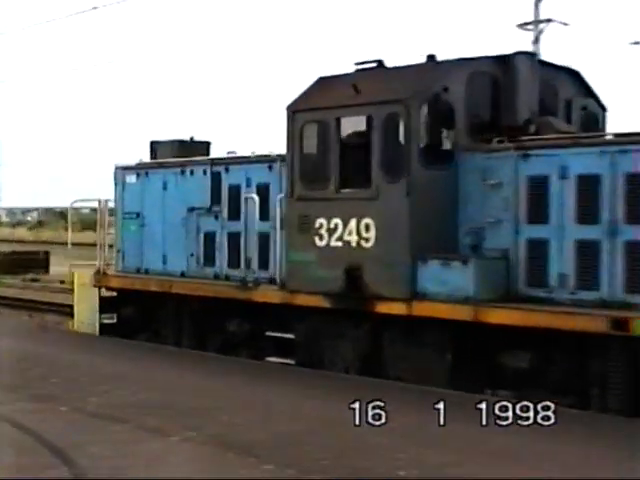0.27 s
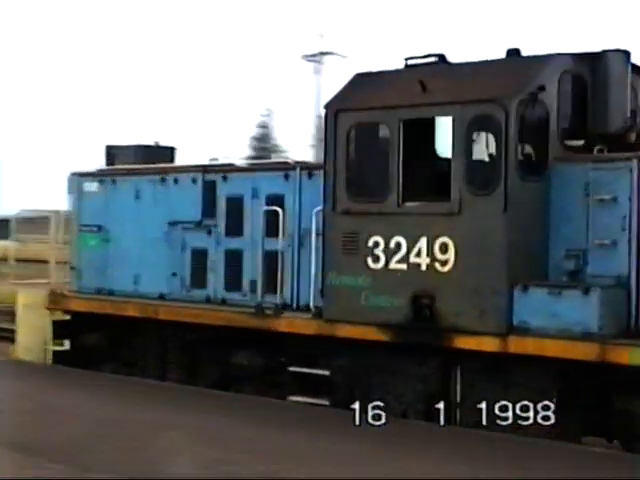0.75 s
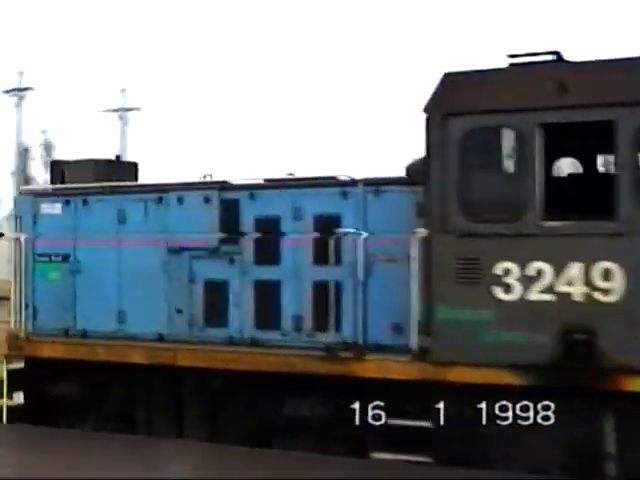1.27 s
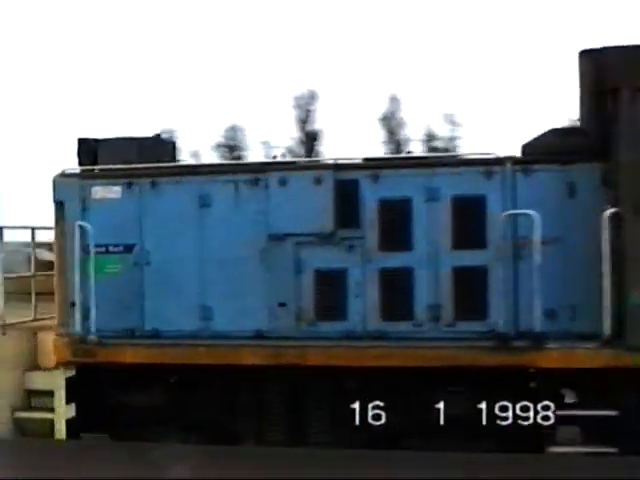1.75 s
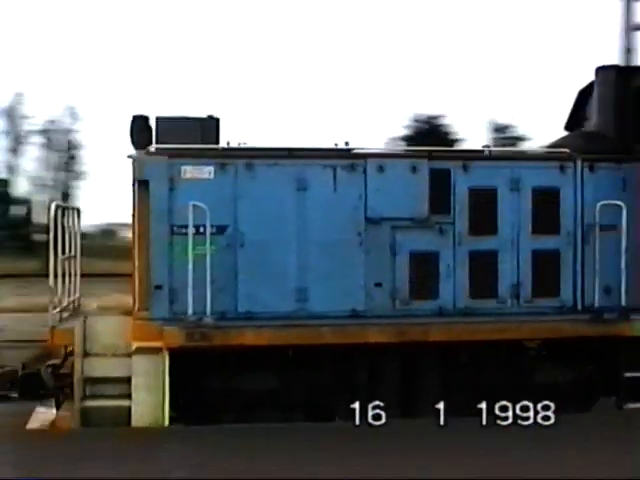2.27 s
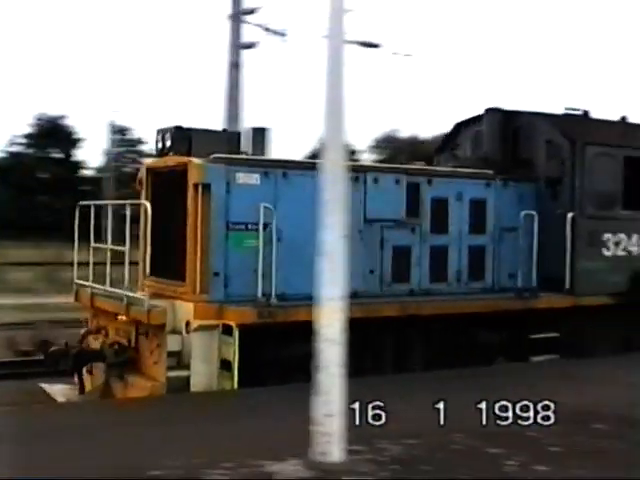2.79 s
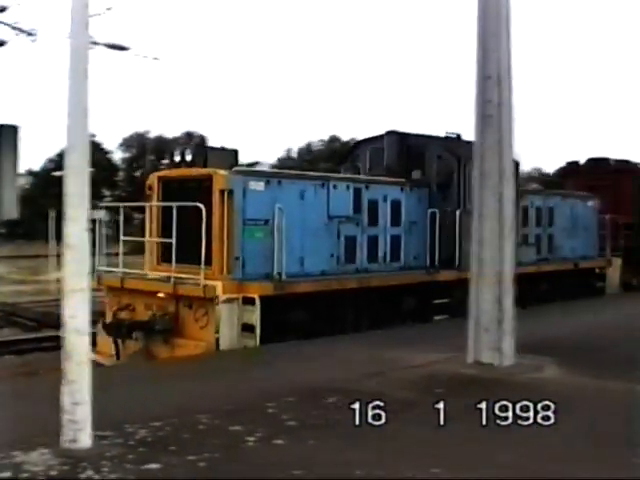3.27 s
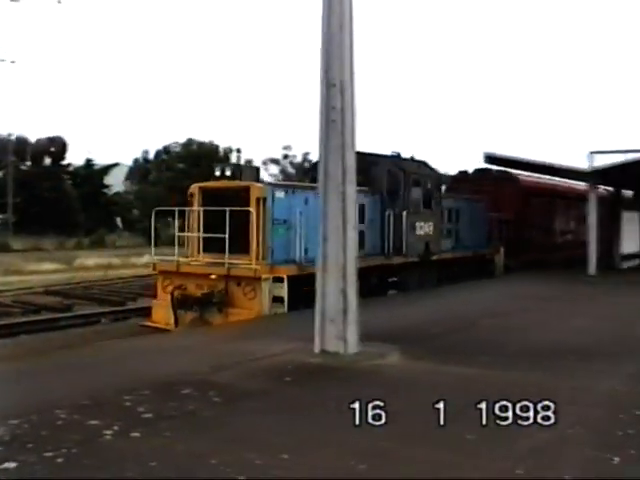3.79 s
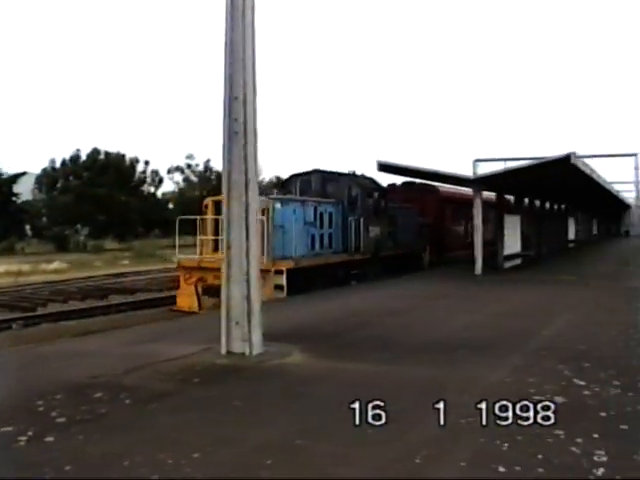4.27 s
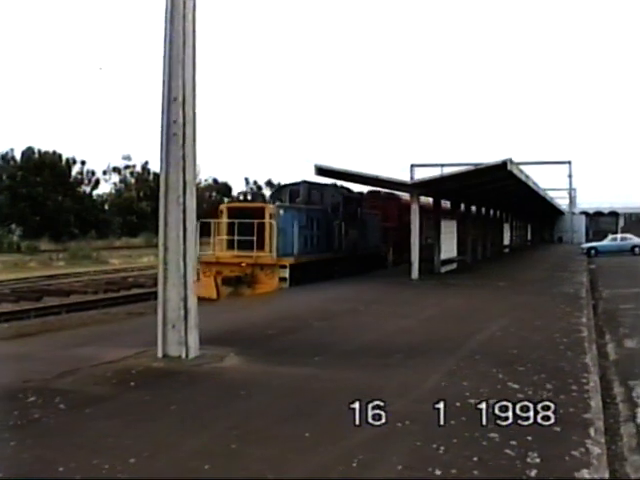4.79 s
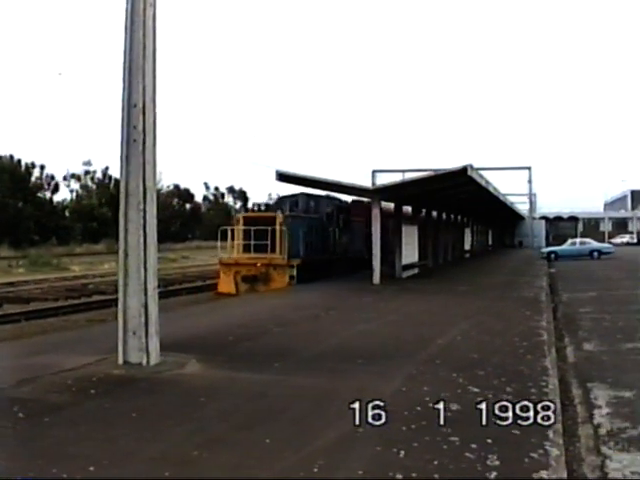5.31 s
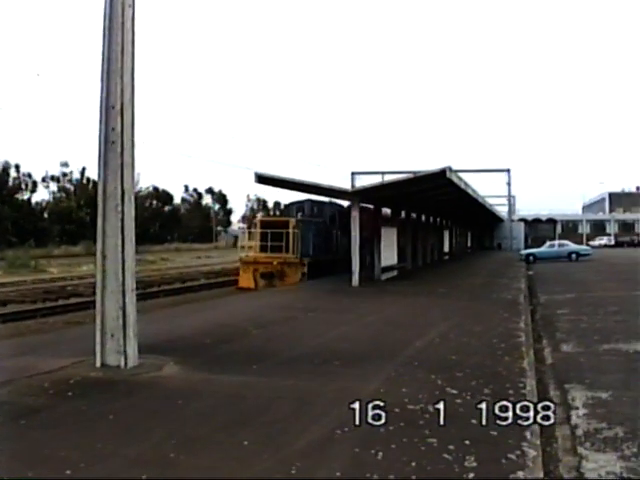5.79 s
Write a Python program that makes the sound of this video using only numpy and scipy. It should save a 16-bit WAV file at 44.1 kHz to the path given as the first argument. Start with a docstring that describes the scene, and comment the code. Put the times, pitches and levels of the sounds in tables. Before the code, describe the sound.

A diesel shunting locomotive rumbles past a platform with rough wheel rush, hollow body booms, knocks and thin squeaks, while wind buffets the microphone.

```python
"""A diesel shunting locomotive rolls past a station platform, with wind on the microphone.
From the start, engine puffs and rolling noise rumble, the steel body drones, and wheels rush, hiss and crackle.
Gusts buffet the microphone; thin squeaks, short one-note booms, dull knocks and sharp ticks join in turn.
A higher hum swells later as the wagons follow, while the rumble slowly fades as the locomotive leaves.
Most layers are shaped noise; the booms are wavering tones and the ticks mix tones with noise."""
import sys
import numpy as np
from scipy import signal
from scipy.fft import rfft, irfft
from scipy.io import wavfile
from scipy.ndimage import uniform_filter1d

SR = 44100
rng = np.random.default_rng(int(sys.argv[2]) if len(sys.argv) > 2 else 0)


def file_out(sig):
    """Save sig as 16-bit WAV at sys.argv[1]."""
    # one column per channel
    cols = np.atleast_2d(sig).T
    # limit, then scale
    lim = np.clip(cols, -1, 1)
    pcm = np.round(lim * 32767).astype(np.int16)
    wavfile.write(sys.argv[1], SR, pcm)


N = 266805
TIME = np.arange(N) / SR  # seconds

FIRING_HZ = 46  # average rate of the engine puffs
DIP_FALL_S = 0.0052
RING_WANDER = .012  # share by which the wheel resonances drift as the contact point moves
GRIT_DB = -7.5  # relative to the finest hiss
OFFSET = .4988  # constant offset, as a share of full scale
EDGE_HZ = 12300  # upper edge of the recorder's band

# rolling noise of the train, swelling as each bogie goes by: (time [s], level [dB])
ROLLING_LEVEL = [(0, -2), (.95, 1), (1.08, 0), (1.27, -5.5), (1.5, -2.5), (1.78, -5), (2.1, -9), (2.45, -7),
                 (3.5, -2.5), (3.72, 1), (3.9, -2.5), (4.05, -4), (4.3, -0.3), (4.62, 4), (4.78, -6.5),
                 (4.93, -3.5), (5.05, -8), (5.2, -3.5), (5.3, -5.5), (5.43, -2.5), (5.52, -7), (5.62, -8),
                 (5.85, -7), (5.97, -3), (6.04, -17)]
# abrupt drops that creep back: (time [s], depth before recovery [dB], recovery time [s])
LEVEL_DIPS = [(1.11, 3.5, 0.068), (1.255, 1.5, 0.045), (1.70, 0.5, 0.12), (1.935, 5.5, 0.042),
              (2.565, 3.5, 0.034), (3.917, 10.5, 0.035), (4.03, 1.5, 0.073), (4.68, 0, .06),
              (5.237, 5, 0.067), (5.712, 6.5, 0.043)]
# how the rumble follows the rolling:
# (level at 0 dB rolling [dB], change per rolling change [dB/dB], fade as the locomotive leaves [dB/s])
RUMBLE_FOLLOW = (-29.5, 0.44, 0.85)
# spectrum shape of the rumble: (frequency [Hz], level per Hz [dB])
RUMBLE_SPECTRUM = [(40, -19), (100, -17), (175, 0), (240, -3), (330, -0.5), (420, -2.5), (520, -4.5),
                   (640, -8), (760, -10.5), (900, -15.5), (1100, -16), (1450, -26.5), (2500, -35),
                   (6000, -87)]
# coarse roar of the wheels, before jolts and dips: (time [s], level [dB])
ROAR_LEVEL = [(0, -39.5), (.3, -40.5), (.7, -37.5), (1, -36.5), (1.28, -46), (1.55, -43.5), (2.1, -48),
              (2.6, -45), (3.4, -42.5), (3.8, -39.5), (4.05, -49), (4.3, -40), (4.6, -38.5), (4.8, -43),
              (5.25, -47.5), (5.6, -44), (6, -44)]
# brief changes of the rumble as the wheels jolt: (middle [s], length [s], rise, or fall if negative [dB])
WHEEL_JOLTS = [(.93, 0.1, 2), (3.63, 0.054, 4), (3.825, 0.057, 6), (4.16, 0.069, -1.5), (4.93, 0.055, 3),
               (5.68, 0.16, 3)]
# low drone of the steel body: (time [s], level at 0 dB rolling [dB])
DRONE_LEVEL = [(0, -33), (.8, -35.5), (1.5, -33), (2.3, -34.5), (3.2, -32), (3.8, -32), (4.05, -30.5),
               (4.5, -36), (5.2, -34), (6, -47)]
# narrow hum that swells as the wagons follow: (time [s], level before dips [dB])
HUM_LEVEL = [(0, -54), (2.6, -56), (3.2, -38), (3.7, -37), (4.05, -41), (4.3, -37), (4.8, -35.5),
             (5.25, -42), (5.6, -38.5), (6, -44.5)]
# rush of wheels and air, before dips: (time [s], level [dB])
RUSH_LEVEL = [(0, -48), (.5, -47), (.6, -45.5), (.95, -45.5), (1.1, -45.5), (1.3, -53), (1.4, -49),
              (1.66, -49), (1.78, -51.8), (1.9, -49.5), (2.25, -52), (2.42, -48.5), (2.7, -50), (2.85, -49),
              (3.3, -47), (3.58, -44.5), (3.78, -42.5), (3.9, -45.5), (4.05, -48), (4.22, -45.5),
              (4.43, -43), (4.5, -43.5), (4.63, -44.5), (4.78, -49.5), (4.95, -47), (5.03, -49.5),
              (5.2, -50.5), (5.29, -52), (5.4, -49.5), (5.5, -49.5), (5.63, -49.5), (5.85, -51.5),
              (6, -51.5)]
# spectrum shape of the rush: (frequency [Hz], level per Hz [dB])
RUSH_SPECTRUM = [(300, -26), (700, 2.5), (1150, 8), (1500, 1), (1900, 0.5), (2300, -2), (2680, -5.5),
                 (3050, -4.5), (3500, -8), (4600, -12), (5300, -12.5), (6500, -27), (11000, -59)]
# finest hiss, before dips: (time [s], level [dB])
HISS_LEVEL = [(0, -63.5), (.25, -64.5), (.4, -62.5), (.8, -62), (1.08, -64.5), (1.28, -69), (1.5, -66.5),
              (1.67, -66.5), (1.76, -68), (2.4, -69), (2.6, -69), (3.1, -68), (3.5, -68), (3.78, -62.5),
              (4.05, -68), (4.38, -62), (4.62, -65), (4.78, -70.5), (4.92, -67.5), (5.25, -72.5),
              (5.6, -71), (6, -70.5)]
# spectrum shape of the hiss: (frequency [Hz], level per Hz [dB])
HISS_SPECTRUM = [(2500, -30.5), (4500, -10.5), (6000, 10), (6900, 5), (8000, 5.5), (9600, 1), (10500, -4),
                 (11500, -9.5), (13000, -21.5)]
# how strongly the wheels ring on the rail: (time [s], level relative to the rush [dB])
RING_LEVEL = [(0, -21), (.8, -34), (1.4, -19), (2.1, -14), (2.8, -12), (3.6, -15.5), (4.5, -15), (6, -15.5)]
# wheel resonances:
# (pitch [Hz], width [Hz], level at 0 dB rolling, before RING_LEVEL [dB], change per rolling change [dB/dB])
WHEEL_RESONANCES = [(1917, 170, -3.5, 1.3), (2977, 270, -1, 0), (5300, 360, -10.5, 0)]
# wind on the microphone, before gusts: (time [s], buffeting level [dB])
WIND_LEVEL = [(0, -37), (1.05, -36), (1.2, -41), (1.6, -38.5), (2.3, -42), (3.7, -39), (4.25, -41.5),
              (4.8, -39.5), (6, -44.5)]
# spectrum shape of the wind: (frequency [Hz], level per Hz [dB])
WIND_SPECTRUM = [(10, -30), (32, -18), (46, -4.5), (54, 1), (72, 6), (110, 8.5), (160, 8), (260, -0.5),
                 (600, -55.5)]
# single gusts: (middle [s], length [s], rise, or fall if negative [dB])
WIND_GUSTS = [(.5, 0.087, -2), (.86, 0.077, 4), (1.92, 0.14, 3), (2.5, 0.13, 8.5), (3.83, 0.13, 5),
              (4.484, 0.069, 7), (4.94, .08, 1), (5.98, .12, 4)]
# spectrum shape of the grit: (frequency [Hz], level per Hz [dB])
GRIT_SPECTRUM = [(1500, -14), (3500, 3.5), (6000, 0), (9500, -5.5), (12000, -18)]
# thin squeaks of steel: (middle [s], length [s], pitch [Hz], level at the top of the swell [dB])
STEEL_SQUEAKS = [(.03, 0.052, 9200, -69), (.122, .05, 6100, -58), (0.347, 0.14, 6170, -62),
                 (0.34, 0.15, 9400, -67), (0.813, 0.1, 5930, -54), (.82, .18, 10100, -68),
                 (1.074, 0.14, 8950, -64), (1.645, .08, 8900, -66), (1.938, .07, 9850, -68),
                 (2.058, .04, 9850, -65), (2.11, 0.067, 9950, -60.5), (2.165, .09, 2950, -55),
                 (2.38, 0.07, 2930, -57), (2.476, 0.085, 2900, -53), (2.52, 0.11, 10100, -67),
                 (3.705, 0.028, 8750, -56), (3.906, .03, 8750, -61), (4.506, .02, 6300, -57),
                 (4.59, .04, 10000, -70), (4.62, 0.1, 5250, -56), (5.622, .16, 5230, -63),
                 (5.96, .1, 5200, -63)]
# brief one-note booms of the steel body: (middle [s], length [s], pitch [Hz], peak level [dB])
BODY_BOOMS = [(.055, 0.092, 276, -26), (.145, 0.082, 245, -25), (.215, 0.11, 237.3, -23.5),
              (.34, 0.09, 280, -25), (.475, 0.099, 239, -29.5), (.92, .06, 423, -31),
              (1.03, 0.12, 272, -26), (1.095, 0.076, 306, -27), (1.595, .1, 256.5, -28),
              (2.9, .08, 230, -30.5), (3.08, 0.089, 303, -31), (3.15, 0.055, 257, -28.5),
              (3.46, 0.2, 241, -26.5), (3.62, 0.074, 357.6, -22.5), (3.79, .09, 234, -30.5),
              (3.68, 0.079, 247, -31), (3.715, .07, 326.5, -27), (4.175, .08, 263, -28.5),
              (4.3, .09, 264, -29.5), (4.335, 0.16, 365.6, -23.5), (4.455, 0.097, 357, -26.5),
              (4.46, 0.07, 248, -25), (4.55, .07, 339, -25), (4.555, 0.084, 241, -27),
              (4.59, 0.074, 399, -27), (4.845, .07, 355, -37), (4.94, .08, 180, -31),
              (5.68, 0.12, 267.5, -33)]
# dull knocks of the running gear: (time [s], level [dB], centre frequency [Hz])
GEAR_KNOCKS = [(.106, -27, 584), (0.686, -36, 920), (1.215, -28.5, 446), (1.515, -31, 597),
               (1.965, -35, 320), (2.498, -33, 410), (2.607, -52, 307), (3.224, -40, 367),
               (3.825, -38, 460), (3.901, -24.5, 383), (3.969, -34, 360), (4.152, -29.5, 490),
               (4.224, -33, 357), (4.369, -35, 514), (4.49, -27.5, 442), (4.588, -29, 600), (5.7, -36, 343)]
# sharp ticks: (time [s], level before the treble cut [dB], centre frequency [Hz], spread [octaves])
STEEL_TICKS = [(0.335, -48, 5200, 0.55), (.416, -50, 3700, .2), (.571, -50, 3500, 0.23),
               (.599, -55, 4200, .25), (.625, -48, 7800, 0.6), (.631, -55, 8700, .3), (.669, -57, 3900, .2),
               (.6829, -51, 6000, .9), (.748, -54, 8100, .15), (0.762, -45, 6500, 0.8),
               (1.229, -64, 7500, .5), (1.2445, -45, 7000, 1.2), (1.4287, -49.5, 8500, .55),
               (1.544, -59, 7500, 0.18), (1.8275, -47.5, 6000, 0.14), (1.8522, -60, 8100, 0.67),
               (2.6786, -53, 4970, 0.38), (2.7963, -44, 5230, 0.6), (3.654, -44.5, 4470, 0.37),
               (3.998, -54, 4550, 0.093), (5.059, -46, 8550, 0.76), (5.07, -53, 9000, .25),
               (5.3348, -57, 5960, 0.21), (5.5734, -56, 6400, 0.56)]
# tones the ticks ring with, before the emphasis of each tick: (frequency [Hz], level [dB])
TICK_TONES = [(3020, 5), (3750, 3), (4850, -0.5), (6050, -0.5), (7750, -3), (8900, -4), (9750, -2.5)]


def gain_of(db):
    """Decibels to amplitude."""
    return 10 ** (np.asarray(db) / 20)


def evened(x):
    """Scales a sound to an rms (average strength) of one."""
    return x / np.sqrt(np.mean(x ** 2) + 1e-20)


def curve(rows):
    """Joins the (time, value) rows of a table into a curve over time."""
    seconds, values = np.transpose(rows)
    return np.interp(TIME, seconds, values)


def add(mix, s, sound):
    """Mixes a sound in at time s."""
    part = mix[max(round(s * SR), 0):][:len(sound)]
    part += sound[:len(part)]


def colour(x, points):
    """Gives x a spectrum drawn on a log-frequency axis."""
    hz, db = np.transpose(points)
    bins = np.fft.rfftfreq(len(x), 1 / SR)
    shape_db = np.interp(np.log(bins + 1), np.log(hz), db)
    return evened(irfft(rfft(x) * gain_of(shape_db), len(x)))


def band(hz, width_hz):
    """Noise in one bell-shaped band; around zero it is a slow random drift."""
    bins = np.fft.rfftfreq(N, 1 / SR)
    bell = np.exp(-((bins - hz) / width_hz) ** 2)
    return evened(irfft(rfft(rng.standard_normal(N)) * bell, N))


def steadied(x, seconds):
    """Evens out the slow swells of a signal and keeps its fast grain."""
    power = abs(uniform_filter1d(x ** 2, max(int(seconds * SR), 2)))
    return x / np.sqrt(power + 1e-9)


def sway(depth_db, rate_hz):
    """A gain that wanders at random."""
    return gain_of(depth_db * band(0, rate_hz))


def swells(rows):
    """A smooth rise and fall back in dB for each row (the other way round if negative)."""
    db = np.zeros(N)
    for s, length, rise_db in rows:
        add(db, s - length / 2, rise_db * np.hanning(int(length * SR)))
    return db


def dips():
    """Brief drops of level in dB: a quick fall, then an exponential recovery."""
    db = np.zeros(N)
    for s, depth_db, recovery_s in LEVEL_DIPS:
        t = np.maximum(TIME - s, 0)
        db -= depth_db * np.minimum(t / DIP_FALL_S, 1) * np.exp(-t / recovery_s)
    return db


def patchy(patch_db, size):
    """Noise whose level varies in small patches of time and frequency."""
    z = signal.stft(rng.standard_normal(N), nperseg=256)[2]
    patches = uniform_filter1d(rng.standard_normal(z.shape), size=4, axis=0)  # across frequency
    patches = evened(uniform_filter1d(patches, size=size, axis=1))  # across time
    return signal.istft(z * gain_of(patch_db * patches))[1][:N]


def firing():
    """The throb of the diesel: one puff for each firing, at a slightly unsteady speed."""
    turns = np.cumsum(FIRING_HZ * (1 + 0.021 * band(0, 3.3))) / SR
    phase = turns % 1  # each puff starts at 0 and dies away
    return evened(np.exp(-phase / 0.14) - np.mean(np.exp(-phase / 0.23)))


def rumble_gain():
    """The rumble's gain follows the rolling and fades as the locomotive leaves."""
    base_db, follow, fade_db_per_s = RUMBLE_FOLLOW
    return gain_of(base_db + follow * curve(ROLLING_LEVEL) - fade_db_per_s * TIME + dips())


def rumble():
    """Exhaust puffs and rolling noise, coloured by the hood and frame, with a coarse roar of the wheels."""
    drive = rng.standard_normal(N) * gain_of(.45 * firing() + 1.1 * band(0, 25))
    body = steadied(colour(drive, RUMBLE_SPECTRUM), seconds=0.046)
    body *= rumble_gain() * sway(depth_db=0.6, rate_hz=15.5)
    roar = steadied(sway(depth_db=2.5, rate_hz=30), seconds=.1) * band(610, 188)
    roar *= gain_of(curve(ROAR_LEVEL) + dips())
    return gain_of(swells(WHEEL_JOLTS)) * (body + roar)


def drones():
    """Two close low resonances of the body, shaken by the rolling, and a somewhat wider hum above them."""
    low = steadied(band(227.0, 38) + 0.93 * band(277.0, 33.0), seconds=0.12)
    low *= sway(depth_db=0.1, rate_hz=9.9)
    hum = steadied(band(344.6, 48), seconds=0.17) * sway(depth_db=1.5, rate_hz=22)
    low_gain = gain_of(curve(DRONE_LEVEL) + curve(ROLLING_LEVEL))
    return gain_of(dips()) * (low_gain * low + gain_of(curve(HUM_LEVEL)) * hum)


def wheel_ring():
    """Wheel resonances that come and go, each drifting in pitch by itself."""
    out = np.zeros(N)
    for hz, width_hz, db, follow in WHEEL_RESONANCES:
        angle = 2 * np.pi * np.cumsum(hz * (1 + RING_WANDER * band(0, 5))) / SR
        # slow noise on a cosine and a sine makes a narrow band around the drifting pitch
        ring = band(0, width_hz) * np.cos(angle) + band(0, width_hz) * np.sin(angle)
        out += gain_of(db + follow * curve(ROLLING_LEVEL)) * sway(depth_db=2.5, rate_hz=12) * ring
    return gain_of(curve(RING_LEVEL)) * out


def rush():
    """Wheels on rail and moving air: a continuous rough rush with wheel resonances and a fine hiss on top."""
    flutter = steadied(sway(depth_db=0.95, rate_hz=59), seconds=0.12)
    body = colour(patchy(patch_db=1.46, size=8), RUSH_SPECTRUM)
    hiss = colour(patchy(patch_db=0.8, size=6), HISS_SPECTRUM) * sway(depth_db=1.24, rate_hz=17)
    wheels = gain_of(curve(RUSH_LEVEL)) * (body + wheel_ring())
    return flutter * gain_of(dips()) * (wheels + gain_of(curve(HISS_LEVEL)) * hiss)


def wind():
    """Lumpy eddies at the microphone, changed in level by a few gusts."""
    eddies = rng.standard_normal(N) * sway(depth_db=0.4, rate_hz=37)
    buffeting = steadied(colour(eddies, WIND_SPECTRUM), seconds=0.23)
    return gain_of(curve(WIND_LEVEL) + swells(WIND_GUSTS)) * buffeting


def grit(per_s=450, spread_db=3.0):
    """Fine crackle of grit under the wheels: many tiny clicks, a few larger ones."""
    sizes = gain_of(spread_db * np.minimum(rng.exponential(1, N), 3)) * rng.choice([-1, 1], N)
    clicks = sizes * (rng.random(N) < per_s / SR)
    return colour(clicks, GRIT_SPECTRUM) * gain_of(curve(HISS_LEVEL) + GRIT_DB + dips())


def squeaks(core_hz=150, skirt_hz=800, skirt_per_hz=0.00013, waver_share=.008):
    """Flanges stick and slip on the rail: a ragged, wavering note inside a scrape that grows with the pitch."""
    out = np.zeros(N)
    stutter = steadied(sway(depth_db=1.5, rate_hz=110), seconds=.04)
    core = steadied(band(0, core_hz), seconds=.02)
    scrape = band(0, skirt_hz)
    waver = 1 + waver_share * band(0, 40)
    for s, length, hz, db in STEEL_SQUEAKS:
        count = max(int(length * SR), 2)
        now = (int(s * SR) + np.arange(count)) % N
        rasp = stutter[now] * (core[now] + skirt_per_hz * hz * scrape[now])
        note = evened(rasp * np.sin(2 * np.pi * np.cumsum(hz * waver[now]) / SR))
        # dividing by the root of two makes it as strong as a sine of that peak level
        add(out, s - length / 2, gain_of(db) * np.hanning(count) * note / np.sqrt(2))
    return out


def booms(waver_hz=7.9, rate_hz=21.7):
    """The steel body booms briefly on one unsteady note for each row."""
    out = np.zeros(N)
    waver = waver_hz * band(0, rate_hz)
    for s, length, hz, db in BODY_BOOMS:
        count = max(int(length * SR), 2)
        turns = np.cumsum(hz + waver[int(s * SR):][:count]) / SR
        note = np.hanning(len(turns)) * np.sin(2 * np.pi * turns)
        add(out, s - length / 2, gain_of(db) * note)
    return out


def knocks(attack_s=0.002, decay_s=0.015, octaves=0.53, size=4096):
    """Slack in the bogies and couplings: short, heavily damped blows of noise around one pitch."""
    out, t = np.zeros(N), TIME[:size]
    bins = np.fft.rfftfreq(size, 1 / SR) + 1
    for s, db, hz in GEAR_KNOCKS:
        damping = (1 + (np.log2(bins / hz) / octaves) ** 2) ** 2
        noise = irfft(rfft(rng.standard_normal(size)) / damping)
        blow = noise * (1 - np.exp(-t / attack_s)) * np.exp(-t / decay_s)
        # the level is the rms if all the energy lay within 10 ms
        add(out, s, gain_of(db) * blow / np.linalg.norm(blow) * np.sqrt(.01 * SR))
    return out


def ticks(decay_s=0.0013, skirt=0.14, crack=1.0, size=512):
    """Steel clicks on steel: a crack of noise and a few short tones, strongest around one pitch."""
    out, t = np.zeros(N), TIME[:size]
    bins = np.fft.rfftfreq(size, 1 / SR) + 1
    mode_hz, mode_db = np.transpose(TICK_TONES)
    for s, db, hz, octaves in STEEL_TICKS:
        away = np.log2(bins / hz) ** 2
        emphasis = np.exp(-.5 * away / octaves ** 2) + skirt * np.exp(-away / 4)
        noise = evened(irfft(rfft(rng.standard_normal(size)) * emphasis))
        tones = np.sin(2 * np.pi * (np.outer(t, mode_hz) + rng.random(len(mode_hz))))
        ring = evened(tones @ (gain_of(mode_db) * np.interp(mode_hz, bins, emphasis)))
        burst = (ring + crack * noise) * (1 - np.exp(-t / 0.00017)) * np.exp(-t / decay_s)
        # the level is the rms if all the energy lay within 2 ms
        add(out, s, gain_of(db) * burst / np.linalg.norm(burst) * np.sqrt(.002 * SR))
    return signal.lfilter(*signal.butter(8, 10700, fs=SR), out)  # cut the extreme treble


def scene():
    """Locomotive and wind at one microphone."""
    steady = rumble() + drones() + rush() + wind() + grit()
    events = squeaks() + booms() + knocks() + ticks()
    return (steady + events)[None]  # one channel


def record(dry):
    """The recorder limits the band and rests on a constant offset voltage."""
    lowpass = signal.firwin(511, EDGE_HZ, window=("kaiser", 9), fs=SR)
    return OFFSET + signal.oaconvolve(dry, lowpass[None], "same", axes=1)


dry = scene()
out = record(dry)
file_out(out)
```